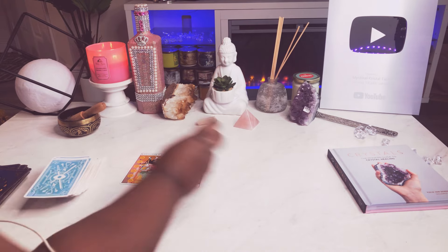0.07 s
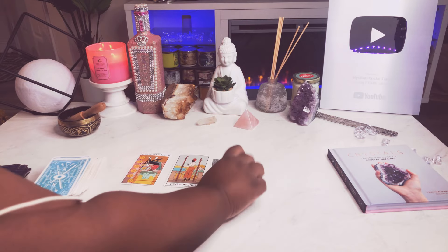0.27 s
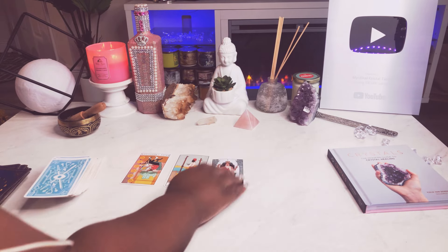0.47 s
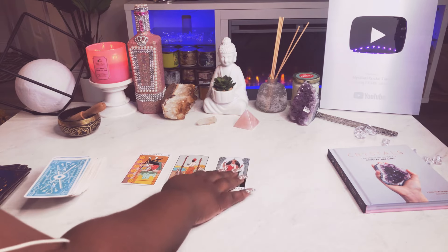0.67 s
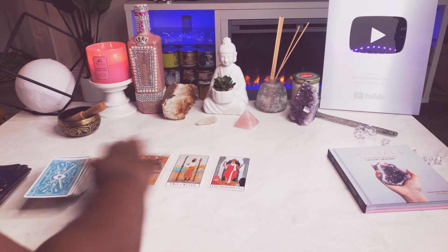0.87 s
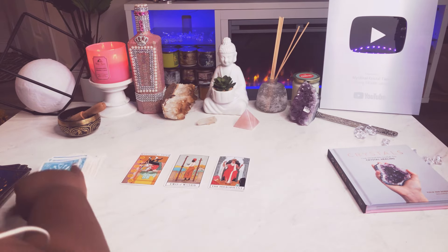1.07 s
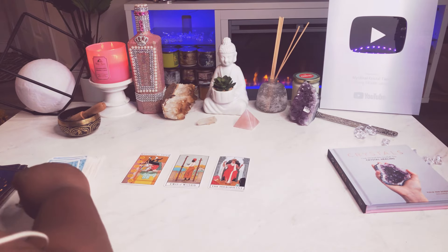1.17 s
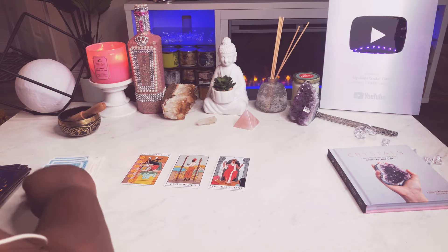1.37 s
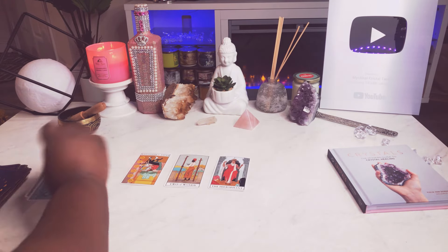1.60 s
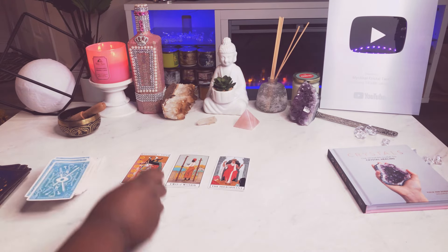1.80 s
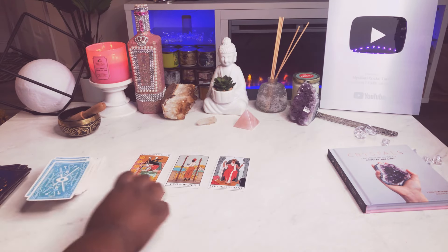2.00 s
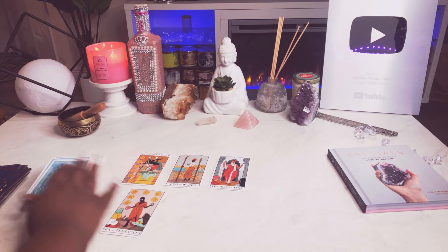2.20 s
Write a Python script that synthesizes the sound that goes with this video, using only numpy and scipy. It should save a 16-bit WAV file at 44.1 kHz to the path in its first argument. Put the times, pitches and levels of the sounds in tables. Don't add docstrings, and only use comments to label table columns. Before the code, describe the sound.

Stiff cards are dealt onto a hard tabletop. Faint brushing and small taps lead to a loud, bright snap at 0.23 s with a low table knock and short room tail. Light taps come near 0.4 s, then sparse rustles and tiny ticks. Fingers knock softly around 1.56 and 1.74 s, a swish leads to a second, less loud snap at 1.87 s, then a fading rustle over quiet room hiss.

```python
import sys
import numpy as np
from scipy import signal
from scipy.fft import rfft, irfft, next_fast_len
from scipy.io import wavfile
from scipy.ndimage import map_coordinates

SR = 44100
rng = np.random.default_rng(int(sys.argv[2]) if len(sys.argv) > 2 else 0)


def waveform_to_disk(signal):
    frames = np.transpose(np.atleast_2d(signal))
    scaled = np.clip(frames, -1, 1) * 32767
    samples = np.round(scaled).astype(np.int16)
    wavfile.write(sys.argv[1], SR, samples)


def decibels_to_gain(level_db):
    exponent = np.asarray(level_db, float) / 20
    return 10 ** exponent


N = 99225

# frequency in Hz, level in dB per Hz.
AIR_COLOUR = [(20, 9), (50, -2), (131, -7), (474, -14), (2220, -20.5), (5000, -22.5), (12600, -21),
              (15800, -25)]
AIR_DB = -61.5
HUM_HZ, HUM_WIDTH_HZ, HUM_DB = 115, 8, -71

# start in seconds, length in seconds, hiss level in dB,
# hiss pitch in Hz, scrape level in dB.
BRUSHES = [(-.03, 0.097, -62, 12000, -80.5), (.04, .05, -65, 12180, -66), (0.121, 0.061, -73, 3297, -58),
           (0.448, 0.073, -64, 12340, -83), (0.531, 0.11, -60.5, 12300, -74.5),
           (0.752, 0.039, -61.5, 12030, -67.5), (0.837, 0.0985, -71.5, 12120, -73.5),
           (1.022, 0.13, -68.5, 12500, -76), (1.145, 0.15, -68.5, 11980, -77),
           (1.3, 0.073, -64.5, 12060, -70.5), (1.345, 0.054, -60.5, 12430, -80),
           (1.399, 0.15, -71, 5000, -77.5), (1.477, 0.0074, -61, 10790, -65),
           (1.481, 0.089, -64, 9800, -67), (1.622, 0.058, -73, 12500, -74),
           (1.773, 0.093, -53, 12480, -61.5), (1.859, 0.015, -61, 5000, -34.5),
           (1.95, 0.11, -53.5, 12240, -65.5), (2.173, 0.1, -60, 12350, -76.5)]
# share of the hiss pitch, width as a share of it, level in dB.
HISS_BANDS = [(1.01, .1, 0), (.78, .55, -2), (1.14, .3, -10)]
# frequency in Hz, width in Hz, level in dB.
SCRAPE_BANDS = [(2800, 530, 3.5), (5000, 190, -5), (990, 1100, -4.5)]
GRAIN_DB, GRAIN_RATE_HZ = 2.2, 500

# start in seconds, level in dB,
# pitch in Hz, 60 dB decay in seconds.
KNOCKS = [(.0062, -48.5, 544, .028), (.091, -46.5, 615, 0.025), (.2295, -47.5, 246, 0.27),
          (.24, -54.5, 297.2, 0.36), (1.5605, -50, 547, 0.03), (1.565, -56, 1124, 0.032),
          (1.683, -58.5, 1050, 0.031), (1.7375, -41, 525, 0.029), (1.7345, -47.5, 321, 0.038),
          (1.87, -50.5, 400, 0.062), (1.881, -55, 216, 0.22)]
# ratio to its pitch, level in dB.
KNOCK_PARTIALS = [(1, 0), (1.58, -3), (2.5, -10), (3.1, -8)]
KNOCK_RISE_S, OVERTONE_T60_S, KNOCK_ROUGH_DB = 0.0012, 0.04, 2.5

# start in seconds, crack level in dB,
# card ring level in dB, table knock level in dB, 60 dB crack decay in seconds.
TAPS = [(.0065, -63.5, -56.5, -55.5, .008), (0.0888, -34.5, -44, -43, 0.0086),
        (0.1236, -28, -27, -46.5, 0.011), (0.1547, -32.5, -28.5, -50.5, 0.013),
        (0.4114, -41, -44, -51, 0.0054), (0.4374, -41, -43, -47, 0.01), (1.0417, -51, -65, -59.5, 0.013),
        (1.0583, -46.5, -52.5, -56, 0.0044), (1.287, -52, -52, -70.5, .006),
        (1.484, -35, -51, -49.5, 0.0065), (1.7345, -47, -34, -37, 0.015), (1.7425, -44, -48, -51.5, 0.0081),
        (1.7994, -30.5, -55.5, -47, 0.0082), (1.804, -44.5, -40.5, -59, 0.0095),
        (1.806, -46, -54, -48.5, 0.004), (1.8415, -47, -50, -56, 0.0064)]
# start in seconds, crack level in dB,
# card ring level in dB, table knock level in dB, 60 dB crack decay in seconds.
SNAPS = [
    (0.2271, -13, -22, -76, 0.009),
    (.2286, -2, -12, -33.5, 0.0066),
    (0.2298, -6, -18.5, -31, .008),
    (.2314, -17, -25, -25, .008),
    (1.863, -31.5, -38, -65, 0.018),
    (1.8644, -19.5, -20.5, -61, .014),
    (1.8666, -7, -22.5, -26.5, 0.0045),
    (1.8683, -15.5, -37, -54, 0.0058),
]
# frequency in Hz, level in dB.
CRACK_COLOUR = [(500, -32.5), (2000, -21), (3800, -11), (6200, -5), (8100, -3.5), (11500, -3),
                (13500, -2.5), (16000, -16.5)]
# frequency in Hz, width in Hz, depth from 0 to 1.
BOUNCE_NOTCHES = [(1710, 280, 1), (4670, 600, .85)]
# frequency in Hz, level in dB, 60 dB decay in seconds.
HELD_CARD = [(3360, 1, 0.011), (2450, -10.5, 0.023), (4160, 0, 0.0036), (5300, -3, 0.0055),
             (7400, -9.5, 0.0078)]
# frequency in Hz, level in dB, 60 dB decay in seconds.
FIRST_CARD = [(3330, -1.5, 0.017), (2695, -13, 0.022), (4600, -11, .009), (6200, -12, 0.011)]
# frequency in Hz, level in dB, 60 dB decay in seconds.
SECOND_CARD = [(3260, 1.5, 0.0096), (2360, -9, .014), (3860, -1.5, .014), (4080, -9, 0.0068),
               (5920, 7.5, 0.0057)]
# frequency in Hz, level in dB, 60 dB decay in seconds.
TABLE = [(189, -22, .014), (272, -7, 0.037), (400, -16.5, .02), (644, -2, .022), (723, -4, 0.018),
         (990, -1.5, .024), (1140, -8.5, .02), (1290, -5.5, .016)]
# frequency in Hz, level in dB, 60 dB decay in seconds.
TABLE_EDGE = [(400, -6, 0.026), (530, -7, 0.0093), (655, 5, 0.013), (820, -2, 0.017), (1056, 7, 0.0093),
              (1446, 0, 0.0082)]
CARD_RISE_S, TABLE_RISE_S, CONTACT_LOW_CUT_HZ = 0.00015, 0.0006, 130

# start in
# seconds, level in dB, pitch in Hz, length in cycles.
MORE_TICKS = [(.0065, -51, 870, 5), (0.0888, -42, 1240, 3.7), (0.0884, -39, 5600, 5.5), (.125, -46, 1100, 4),
              (.155, -58, 1140, 4), (.228, -34, 285, 2.8), (0.2316, -32, 990, 6.2), (1.561, -51.5, 798, 5.8),
              (1.561, -55.5, 1700, 7.6), (1.7365, -45.5, 558, 5), (1.738, -47.5, 1130, 5.6),
              (1.8645, -34.5, 1440, 6)]
# start in seconds,
# level in dB, pitch in Hz, length in cycles.
TICKS = [(.0236, -38.5, 9220, 2.4), (.0586, -44.5, 12130, 6.8), (.0622, -52, 12470, 17),
         (.0705, -47.5, 12700, 7.2), (.0788, -41.5, 12720, 10), (.095, -52.5, 6300, 3.7),
         (0.1234, -24.5, 6720, 11), (0.4374, -27.5, 5450, 2.7), (.486, -50.5, 12400, 10),
         (.766, -48.5, 11900, 5.7), (.945, -46, 13540, 2.5), (1.021, -47.5, 6010, 1.2),
         (1.104, -50.5, 14800, 8), (1.116, -46, 12600, 6.3), (1.166, -46.5, 12500, 6.35),
         (1.3605, -44, 11960, 5), (1.392, -43.5, 11500, 8.1), (1.405, -49.5, 12480, 5),
         (1.4786, -49, 5060, 14), (1.483, -45, 4930, 19), (1.4839, -46.5, 2600, 11.6),
         (1.686, -56.5, 5900, 11), (1.7416, -49, 12000, 6.8), (1.8215, -44, 12500, 9.8),
         (0.2292, -4.5, 8155, 12), (1.8662, -17.5, 10300, 20), (1.8688, -16, 12660, 22),
         (1.855, -38.5, 11900, 4.6), (2.2074, -52.5, 12870, 11), (0.2271, -27.5, 1270, 5),
         (0.5312, -52, 12530, 4), (.5537, -50, 12960, 9.1), (1.2177, -56.5, 12000, 3.6),
         (1.3185, -56, 12000, 4), (1.338, -55.5, 12500, 5.5), (1.9986, -37, 12300, 6),
         (2.1933, -53.5, 12500, 6), (1.02, -58.5, 2760, 7.5), (1.652, -55, 13000, 4),
         (1.562, -54.5, 3460, 6), (1.828, -57, 2900, 3.9), (1.8415, -44, 3700, 5), (2.014, -50, 2720, 10),
         (2.207, -54.5, 8340, 8), (2.238, -58, 2810, 8.5), (1.8783, -30.5, 8570, 4)]

# frequency in Hz, level in dB.
ROOM_THUD = [(120, -27), (260, 1), (600, 1.5), (1200, -9.5), (2000, -14), (4000, -41)]
# frequency in Hz, 60 dB decay in seconds.
ROOM_DECAY = [(150, 0.25), (600, 0.44), (3000, 0.59), (6000, 0.53), (9000, 0.45), (14000, 0.33)]
# frequency in Hz, level in dB.
ROOM_COLOUR = [(150, -6.5), (1000, 8.5), (1500, 3.5), (2100, -3.5), (3300, -6), (6000, -3), (10000, -1),
               (15000, 0.5)]
ROOM_DB, ROOM_BUILD_S, ROOM_DELAY_S = -8, 0.0055, 0.0016
ROOM_CRACK_DB, ROOM_CARD_DB, ROOM_THUD_DB, CARD_SPREAD_HZ = 16, 19.5, 23, 3000
TAIL_GRAIN_DB, SMALL_SOUNDS_ROOM_DB = 0.5, -7
# delay in seconds, level in dB.
WALL_ECHOES = [(0.0123, -28), (.0155, -25.5), (0.023, -22)]

# start in seconds, length in seconds,
# level in dB, frequency in Hz, width in Hz.
HUMMING = [
    (.128, 0.072, -57, 2700, 210),
    (0.11, 0.1, -57.5, 2400, 580),
    (1.872, 0.13, -53.5, 2280, 110),
    (1.875, .14, -53, 3870, 130),
    (1.7, 0.14, -53.5, 5350, 200),
    (0.27, .12, -56, 1480, 150),
    (.24, 0.089, -53, 1110, 82),
    (1.1, 0.314, -75.5, 2800, 110),
]
TOP_HZ = 16150


def unit(x):
    return x / np.sqrt(np.mean(x ** 2) + 1e-20)


def along(points, hz):
    point_hz, value = np.transpose(points)
    return np.interp(np.log(hz + 1), np.log(point_hz + 1), value)


def filtered(x, response):
    size = next_fast_len(len(x) + 8192)
    spectrum = rfft(x, size) * response(np.fft.rfftfreq(size, 1 / SR))
    return irfft(spectrum, size)[:len(x)]


def resonance(f, hz, width):
    return 1j * f * width / (hz * hz - f * f + 1j * f * width)


def peaks(table):
    return lambda f: sum(decibels_to_gain(db) * resonance(f, hz, width) for hz, width, db in table)


def noise(response, size=N):
    return unit(filtered(rng.standard_normal(size), response))


def wobble(rate_hz):
    return map_coordinates(rng.standard_normal(N // 20), [np.arange(N) * rate_hz / SR])


def ring(modes, t):
    total = np.zeros(len(t))
    for hz, db, t60 in modes:
        decay = decibels_to_gain(db + 2 * rng.normal() - 60 * t / t60)
        total += decay * np.sin(2 * np.pi * hz * t)
    return total


def air():
    hiss = decibels_to_gain(AIR_DB + 0.47 * wobble(6)) * noise(lambda f: decibels_to_gain(along(AIR_COLOUR, f)))
    hum = decibels_to_gain(HUM_DB) * noise(peaks([(HUM_HZ, HUM_WIDTH_HZ, 0)]))
    return hiss + hum


def brushing():
    t, out = np.arange(N) / SR, np.zeros(N)
    scrape = noise(peaks(SCRAPE_BANDS))
    for s, length, hiss_db, hz, scrape_db in BRUSHES:
        bands = peaks([(hz * share, hz * width, db) for share, width, db in HISS_BANDS])
        hiss = noise(lambda f: bands(f) ** 2)
        swell = np.sin(np.pi * np.clip((t - s) / length, 0, 1)) ** 1.5
        out += swell * (decibels_to_gain(hiss_db) * hiss + decibels_to_gain(scrape_db) * scrape)
    return out * decibels_to_gain(GRAIN_DB * wobble(GRAIN_RATE_HZ))


def knocks():
    out, t = np.zeros(N + SR), np.arange(SR // 2) / SR
    rise = 1 - np.exp(-t / KNOCK_RISE_S)
    for s, db, hz, t60 in KNOCKS:
        modes = []
        for ratio, level in KNOCK_PARTIALS:
            decay = t60 if ratio == 1 else min(t60, OVERTONE_T60_S) / np.sqrt(ratio)
            modes.append((hz * ratio, level, decay))
        out[round(s * SR):][:len(t)] += decibels_to_gain(db) * ring(modes, t) * rise
    return out[:N] * decibels_to_gain(KNOCK_ROUGH_DB * wobble(70))


def bounce(f):
    return np.prod([1 - np.clip(depth, 0, 1) * resonance(f, hz, width)
                    for hz, width, depth in BOUNCE_NOTCHES], axis=0)


def contacts(rows, card_modes, table_modes):
    out, t = np.zeros(N + SR), np.arange(SR // 10) / SR
    card_rise = 1 - np.exp(-t / CARD_RISE_S)
    table_rise = 1 - np.exp(-t / TABLE_RISE_S)
    for s, crack_db, card_db, table_db, t60 in rows:
        burst = noise(lambda f: decibels_to_gain(along(CRACK_COLOUR, f)) * bounce(f), size=len(t))
        crack = burst * decibels_to_gain(crack_db - 60 * t / t60)
        knock = decibels_to_gain(table_db) * ring(table_modes, t) * table_rise
        card = decibels_to_gain(card_db) * ring(card_modes, t)
        out[round(s * SR):][:len(t)] += (crack + card) * card_rise + knock
    return filtered(out[:N], lambda f: (1j * f / (1j * f + CONTACT_LOW_CUT_HZ)) ** 2)


def pats_and_ticks():
    out, t = np.zeros(N + SR), np.arange(SR // 100) / SR
    for s, db, hz, cycles in TICKS + MORE_TICKS:
        progress = np.clip(t * hz / cycles, 0, 1)
        swell = np.sin(np.pi * np.sqrt(progress)) ** 2
        out[round(s * SR):][:len(t)] += decibels_to_gain(db) * swell * np.sin(2 * np.pi * hz * t)
    return out[:N]


def radiated(rows):
    s, crack_db, card_db, table_db, _ = np.transpose(rows)

    def clicks(db):
        return np.bincount(np.round(s * SR).astype(int), decibels_to_gain(db), N)

    crack = filtered(clicks(crack_db + ROOM_CRACK_DB), lambda f: decibels_to_gain(along(CRACK_COLOUR, f)))
    card = filtered(clicks(card_db + ROOM_CARD_DB), peaks([(FIRST_CARD[0][0], CARD_SPREAD_HZ, 0)]))
    thud = filtered(clicks(table_db + ROOM_THUD_DB), lambda f: decibels_to_gain(along(ROOM_THUD, f)))
    return crack + card + thud


def room(x):
    hz, t, bands = signal.stft(rng.standard_normal(SR * 2 // 3), SR, nperseg=256)
    colour_db = along(ROOM_COLOUR, hz)[:, None]
    decay_db = 60 * t / along(ROOM_DECAY, hz)[:, None]
    tail = signal.istft(bands * decibels_to_gain(colour_db - decay_db), SR, nperseg=256)[1]
    since = np.maximum(np.arange(len(tail)) / SR - ROOM_DELAY_S, 0)
    tail = tail * (1 - np.exp(-since / ROOM_BUILD_S))
    return signal.fftconvolve(x, decibels_to_gain(ROOM_DB) * tail / np.linalg.norm(tail))[:N]


def walls(x):
    bright = filtered(x, lambda f: 1j * f / (1j * f + 5000))
    return sum(decibels_to_gain(db) * np.pad(bright, (round(s * SR), 0))[:N] for s, db in WALL_ECHOES)


def humming():
    t, out = np.arange(N) / SR, np.zeros(N)
    for s, length, db, hz, width in HUMMING:
        swell = np.sin(np.pi * np.sqrt(np.clip((t - s) / length, 0, 1)))
        out += decibels_to_gain(db) * swell * noise(peaks([(hz, width, 0)]))
    return out


def scene():
    small = brushing() + knocks() + pats_and_ticks()
    hits = contacts(TAPS, HELD_CARD, TABLE_EDGE)
    hits += contacts(SNAPS[:4], FIRST_CARD, TABLE)
    hits += contacts(SNAPS[4:], SECOND_CARD, TABLE_EDGE)
    tails = sum(room(radiated([row])) for row in SNAPS + TAPS)
    tails = tails * decibels_to_gain(TAIL_GRAIN_DB * wobble(150))
    tails += decibels_to_gain(SMALL_SOUNDS_ROOM_DB) * room(small)
    return (air() + small + hits + walls(hits) + tails + humming())[None]


def top_cut(x):
    return signal.sosfilt(signal.butter(12, 15860, fs=SR, output="sos"), x)


def record(dry):
    limited = filtered(dry[0], lambda f: 1 / (1 + (f / TOP_HZ) ** 60))[None]
    mix = np.clip(limited, -1, 1)
    return top_cut(mix)


dry = scene()
out = record(dry)
waveform_to_disk(out)
```